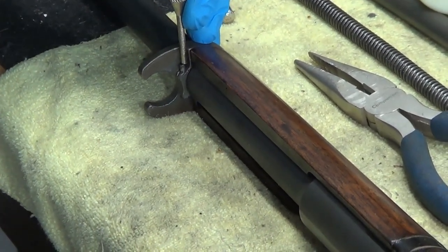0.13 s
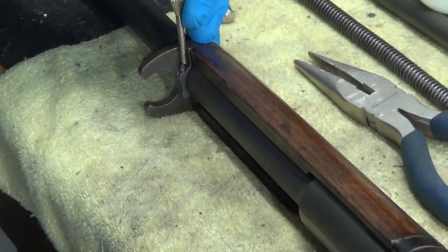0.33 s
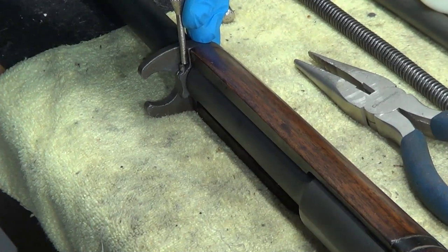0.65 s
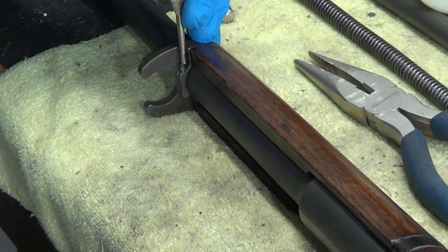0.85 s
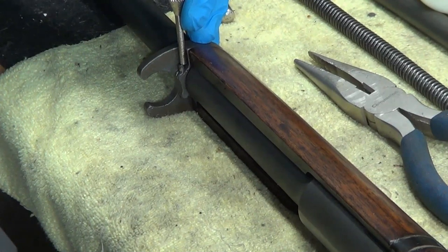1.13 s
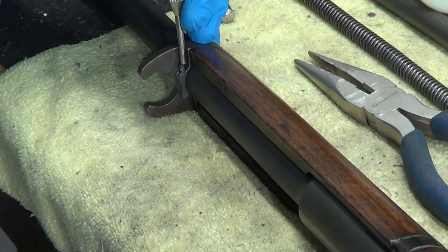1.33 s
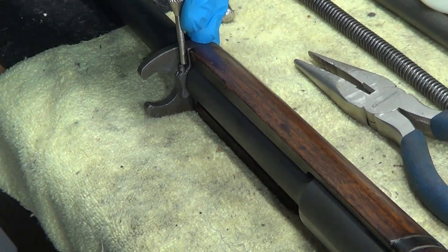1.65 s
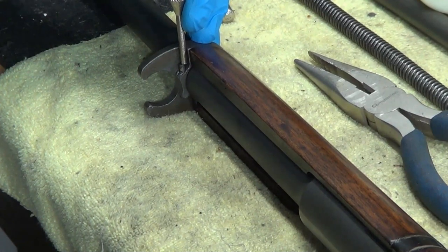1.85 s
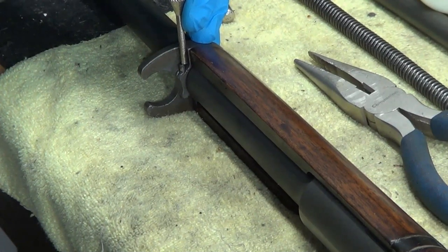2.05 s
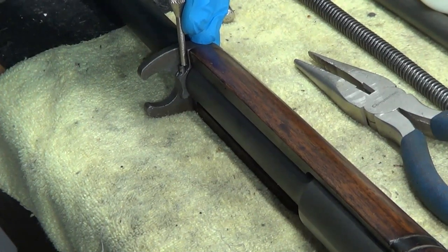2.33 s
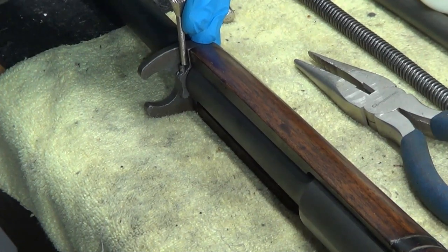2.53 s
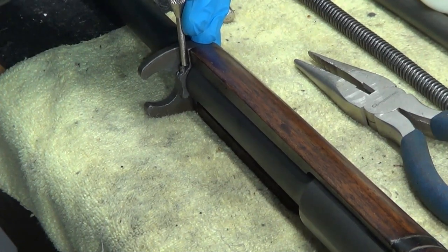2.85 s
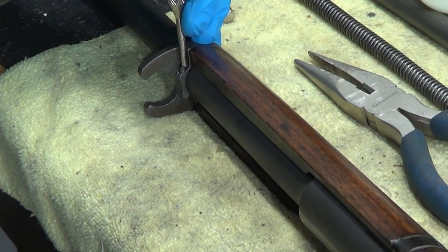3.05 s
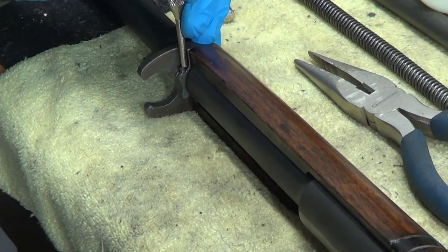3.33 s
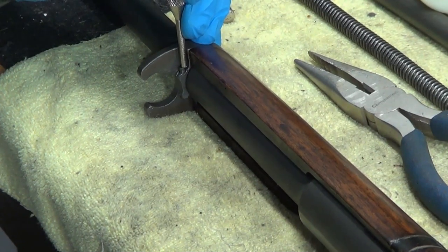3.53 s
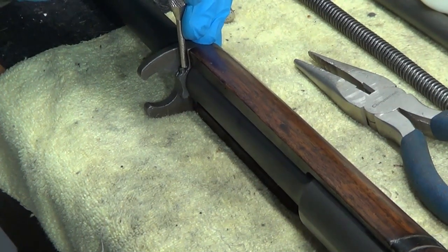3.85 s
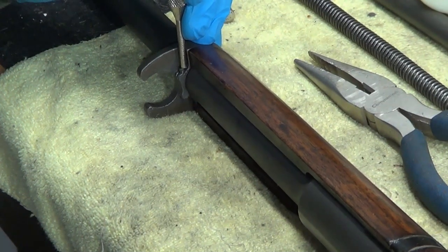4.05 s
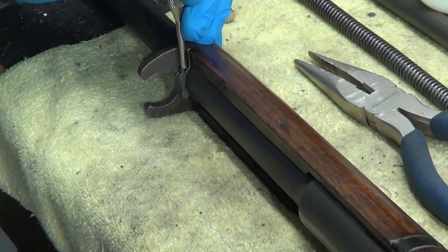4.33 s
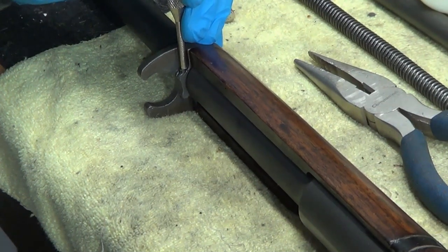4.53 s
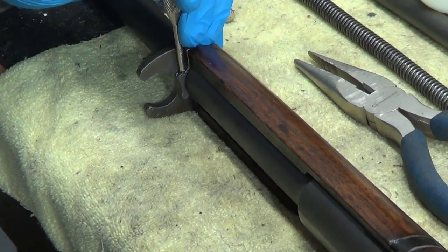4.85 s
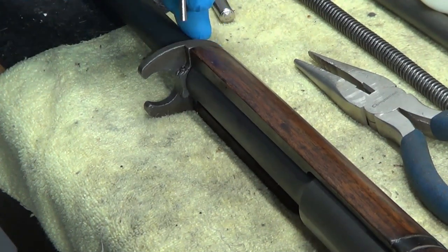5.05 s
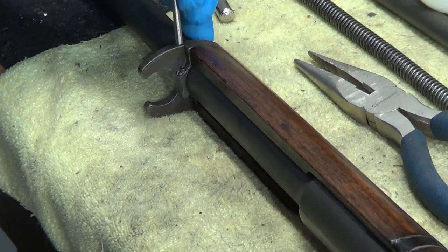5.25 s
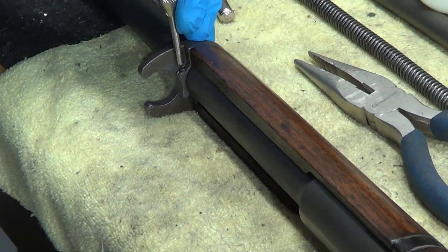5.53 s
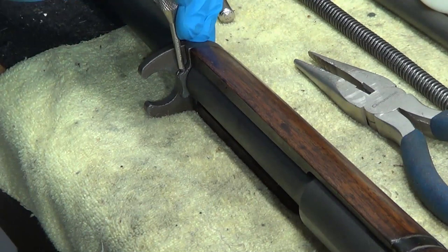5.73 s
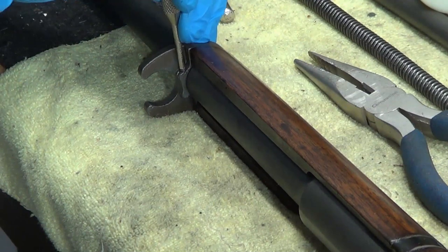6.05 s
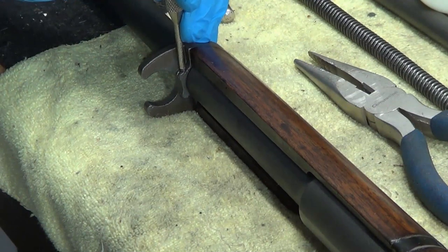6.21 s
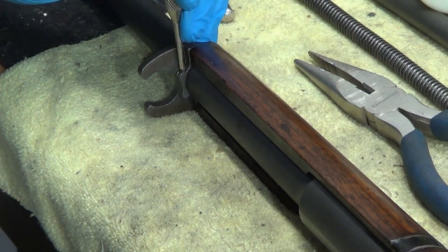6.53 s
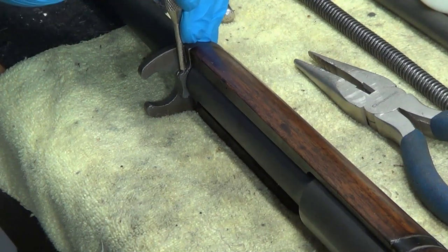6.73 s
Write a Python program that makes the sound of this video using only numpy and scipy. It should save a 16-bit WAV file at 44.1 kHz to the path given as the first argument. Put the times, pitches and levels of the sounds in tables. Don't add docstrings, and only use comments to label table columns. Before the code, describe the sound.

Close in a hard-walled room, a small hammer strikes a steel pin punch on a wood-and-steel piece. One tap and a knock, a lighter tap, then a steady run of about five clinks a second. The run stops, the punch is lifted and reset with tiny clicks and scrapes, and three last taps follow, over faint fan hum and a very high whine.

```python
import sys
import numpy as np
from scipy import signal
from scipy.fft import rfft, irfft
from scipy.io import wavfile

SR = 44100
rng = np.random.default_rng(int(sys.argv[2]) if len(sys.argv) > 2 else 0)


def persist_wave(psi):
    counts = np.round(np.clip(psi, -1, 1) * 32767).astype(np.int16)
    wavfile.write(sys.argv[1], SR, np.atleast_2d(counts).T)


def decibels_to_gain(level_db):
    exponent = np.asarray(level_db, float) / 20
    return 10 ** exponent


N = 303408
LEAD = SR // 4
LONG = N + LEAD

# start_s, strength_db, brightness_db, crack_db, squareness of the face (-0.61 to 1.9, higher is
BLOWS = [(-0.1304, -30, -4, -4, 0.5), (0.0722, -31.5, -4.5, 2.5, 0.51), (1.14, -38, 0.5, 7.5, -0.39),
         (1.732, -37.5, -2.6, 8, -0.47), (1.9584, -33.5, -3.5, 1, -0.41), (2.1688, -31, -5, 2, 0.47),
         (2.3741, -31, -5.4, 2, 0.76), (2.6069, -30, -4, 1.5, 0.33), (2.8176, -30, -5.5, 1.5, 0.26),
         (3.0153, -30.5, -2.7, 1, 0.45), (3.2074, -33.5, -2.5, 6, 0.93), (3.4209, -32, -6, 3, 0.88),
         (3.6375, -30.5, -5.5, -1.5, 0.28), (3.8413, -35, -3, 2.5, 0.77), (4.0593, -31, -2.5, 1, 0.28),
         (4.2656, -29, -4, -1.5, 0.3), (4.464, -30, -4, 0.5, 0.67), (4.6648, -30.5, -5.5, 0, 0.37),
         (4.8263, -27.5, -6, -1, 0.99), (6.4307, -40, 3, 6.5, -0.61), (6.6517, -28.5, -1.5, -3.5, 1.07),
         (6.878, -25, -15, -9.5, 1.9)]
START_S, STRENGTH_DB, BRIGHT_DB, CRACK_DB, SQUARENESS = np.array(BLOWS).T

# pitch_hz, level_db, sinking_db_per_s, squareness_db, reseated_db
WASH_TONE = [(750, -1.1, 0.04, 3.4, -0.5), (1220, 0, 0.57, 2.9, -12.5), (1520, 0.5, 0.46, 1.2, -0.5),
             (1980, 0, 0.97, 1.6, -5.7), (2570, 5, -0.8, 2.6, 2.6), (4300, 8.5, -1.29, 0.3, 0),
             (6330, -0.6, 0.21, -3, -0.7), (9050, 0.8, -0.82, 7, 1)]


def rms_one(x):
    return x / np.sqrt(np.mean(x ** 2) + 1e-20)


def at_hz(points, hz):
    points_hz, values = np.array(points)[:, :2].T
    return np.interp(np.log(hz), np.log(points_hz), values)


def clicks(seconds, sizes):
    out = np.full(LONG, 1e-18)
    places = (np.asarray(seconds) * SR).astype(int) + LEAD
    np.add.at(out, np.minimum(places, LONG - 1), sizes)
    return out


def ring(x, hz, t60):
    radius = decibels_to_gain(-60 / (t60 * SR))
    angle = 2 * np.pi * hz / SR
    return signal.lfilter([0, np.sin(angle)], [1, -2 * radius * np.cos(angle), radius * radius], x)


def band(x, low_hz, high_hz):
    sos = signal.butter(2, [low_hz, min(high_hz, .45 * SR)], "band", fs=SR, output="sos")
    return signal.sosfilt(sos, x)


def delayed(x, seconds):
    return np.pad(x, (round(seconds * SR), 0))[:LONG]


def toned(rows, hz):
    reseat_s = 5.5
    base_db, sink_db, square_db, reseat_db = (at_hz([(row[0], row[k]) for row in rows], hz) for k in (1, 2, 3, 4))
    shift_db = base_db + sink_db * START_S + square_db * SQUARENESS + reseat_db * (START_S > reseat_s)
    return shift_db * (hz > 600)


def struck(modes, level_db, tone, spread_db, swell_cycles=0):
    chance = rng.standard_normal((len(START_S), len(modes)))
    out = np.zeros(LONG)
    for k, (hz, db, t60) in enumerate(modes):
        blow_db = level_db + db + toned(tone, hz) + spread_db * chance[:, k]
        mode = ring(clicks(START_S, decibels_to_gain(blow_db)), hz, t60)
        if swell_cycles:
            mode = ring(mode, hz, swell_cycles / hz) * 2 * np.log(1000) * hz / (swell_cycles * SR)
        out += mode
    return out


def room_bands(build_s):
    # pitch_hz, level_db (per Hz)
    echo_colour = [(170, -3), (300, -4), (600, -11.5), (900, -10), (1350, -1.5), (2000, -6), (2700, -3.5),
                   (3800, -8), (5600, -10.5), (7700, -4), (9500, -9.5), (11500, -20), (15500, -28.5)]
    # pitch_hz, t60_s
    room_t60 = [(200, 0.26), (800, 0.39), (2200, 0.33), (6000, .32), (15000, 0.19)]
    t = np.arange(SR // 2) / SR
    edges_hz = 120 * 2 ** np.arange(0, 7.2, 1 / 6)
    white = rng.standard_normal((2, 4, len(t)))
    for k, (low_hz, high_hz) in enumerate(zip(edges_hz, edges_hz[1:])):
        hz = np.sqrt(low_hz * high_hz)
        swell = 1 - np.exp(-t / (build_s * max(1, 1500 / hz)))
        decay = decibels_to_gain(at_hz(echo_colour, hz) - 60 * t / at_hz(room_t60, hz))
        yield hz, band(white[k % 2], low_hz, high_hz) * swell * decay


def blows_in_room(bands, spread_db, slip_s):
    top_hz, top_db, top_octaves = 8060, 3.5, 0.087
    top_octaves_per_square, top_scatter_octaves = 0.088, .03
    sameness = 1.5
    count = len(START_S)
    chance = rng.standard_normal((count, len(bands), 2))
    moved_octaves = top_octaves_per_square * SQUARENESS + top_scatter_octaves * rng.standard_normal(count)
    peak_hz = top_hz * 2 ** moved_octaves
    blend = rng.standard_normal((count, 4)) + [sameness, 0, 0, 0]
    blend /= np.linalg.norm(blend, axis=1, keepdims=True)
    out = np.zeros(LONG + SR)
    for k, (hz, answers) in enumerate(bands):
        tilt_db = (BRIGHT_DB + 7.0) * np.clip(np.log2(hz / 3000), 0, 1) + toned(WASH_TONE, hz)
        peak_db = top_db * np.exp(-(np.log2(hz / peak_hz) / top_octaves) ** 2)
        gains = decibels_to_gain(STRENGTH_DB + tilt_db + peak_db + spread_db * chance[:, k, 1])
        starts = ((START_S + slip_s * np.abs(chance[:, k, 0])) * SR).astype(int) + LEAD
        for start, answer, gain in zip(starts, blend @ answers, gains):
            out[start:start + len(answer)] += gain * answer
    return out[:LONG]


def steel_crack():
    # pitch_hz, level_db, t60_s
    crack_modes = [(1500, -13, 0.037), (2100, -19, 0.0046), (3775, -10.5, 0.0092), (6300, -8.5, 0.0034),
                   (9050, -2.5, 0.0026), (14500, -16, 0.00081)]
    # pitch_hz, level_db, sinking_db_per_s, squareness_db, reseated_db
    crack_tone = [(1460, -8, -0.13, -8.5, .1), (2540, -23.5, 5.5, 5, 3), (3990, 6.5, -1.45, -0.3, .1),
                  (5900, 2, 0.33, -9, .1), (8800, -8.5, 0.91, 2.9, 0.094)]
    # delay_s, level_db
    walls = [
        (.0052, -5),
        (.0096, -4),
        (.0145, -8),
    ]
    crack = band(struck(crack_modes, STRENGTH_DB + CRACK_DB + 31, crack_tone, spread_db=1), 900, 12500)
    crack = decibels_to_gain(-11) * crack + delayed(crack, .00044)
    echoes = sum(decibels_to_gain(db) * delayed(crack, s) for s, db in walls)
    return crack + band(echoes, 900, 14400)


def followed_db(level_db, share):
    mean_blow_db = -30.5
    return level_db + share * (STRENGTH_DB - mean_blow_db)


def ringing_steel():
    # pitch_hz, level_db, t60_s
    steel_modes = [(430.3, -6.5, 0.57), (458, -14, 0.79), (742.5, -3, 0.49), (806, -6, 0.27),
                   (1083, -9.5, 0.43), (1171, 6.5, 0.16), (1354, -2, 0.46), (1653, -0.5, 0.23),
                   (1668, -2.5, 0.12), (1968, 0, 0.16), (2560, 2, 0.2), (1810, -17, 0.13),
                   (3776, -5.5, 0.19), (4430, -2, 0.14)]
    return struck(steel_modes, followed_db(-45, 0.34) + 15.0, WASH_TONE, spread_db=3, swell_cycles=44.0)


def bench_thud():
    # pitch_hz, level_db, t60_s
    bench_modes = [(156.6, -19, 0.54), (179.3, -5, 0.21), (204, -19.5, 0.15), (353, -7, 0.066)]
    soft = np.exp(-1 / (0.0021 * SR))
    push = struck(bench_modes, followed_db(-41, .55) + 29.0, WASH_TONE, spread_db=1.5)
    thud = signal.lfilter([1 - soft], [1, -soft], push)
    return band(band(thud, 140, 360), 140, 360)


def room_wash(bands):
    # pitch_hz, width_hz, level_db
    lumps = [(1350, 350, -8.5), (1925, 335, 1), (2640, 480, -4.5), (3790, 230, -4.5), (4580, 140, -13)]
    wash = blows_in_room(bands, spread_db=2, slip_s=.0002)
    for hz, width_hz, db in lumps:
        wash = wash + decibels_to_gain(db) * band(wash, hz - width_hz / 2, hz + width_hz / 2)
    return decibels_to_gain(21.0) * wash


def hammer(bands):
    return steel_crack() + ringing_steel() + bench_thud() + room_wash(bands)


def background():
    # pitch_hz, level_db (per Hz)
    air_colour = [(18, -61), (30, -7), (140, -4.5), (256, -8.5), (292, -1), (324, -11), (389, -1),
                  (455, -3.5), (673, -9.5), (787, -3), (852, -7.5), (8950, -24), (15500, -23.5)]
    # pitch_hz, width_hz, level_db
    fan_hums = [(660, 66, -59.5), (3530, 74, -63.5), (4140, 72, -71), (4740, 110, -68), (9960, 97, -72.5),
                (13200, 400, -69)]
    air_db, whine_db = -51 - 1.5, -59
    whine_hz, throb_hz, throb_null_s = 15741.5, 6.535, .447
    hz = np.maximum(np.fft.rfftfreq(LONG, 1 / SR), 10)
    air = rms_one(irfft(rfft(rng.standard_normal(LONG)) * decibels_to_gain(at_hz(air_colour, hz)), LONG))
    white = rng.standard_normal(LONG)
    fan = sum(decibels_to_gain(db) * rms_one(ring(white, centre_hz, 2.2 / width_hz)) for centre_hz, width_hz, db in fan_hums)
    t = (np.arange(LONG) - LEAD) / SR
    throb = np.sin(2 * np.pi * throb_hz * (t - throb_null_s))
    whine = 2 * np.sin(2 * np.pi * whine_hz * t) * throb
    return decibels_to_gain(air_db) * air + fan + decibels_to_gain(whine_db) * whine


def grit(length):
    t = np.arange(SR // 5) / SR
    uneven = rng.standard_normal(len(t)) * decibels_to_gain(3 * rng.standard_normal(len(t)))
    return uneven * (np.exp(-(t / length) ** 2) + 2 * np.exp(-t / .0008))


def add(out, s, sound, level_db, length):
    start = round(s * SR) + LEAD
    out[start:start + len(sound)] += decibels_to_gain(level_db) * rms_one(sound) * np.sqrt(5 * length)


def punch_knocks(out):
    # start_s, length_s, low_db, middle_db, top_db
    knocks = [
        (0.261, 0.013, -26.5, -20.5, -35.5),
        (1.398, 0.018, -35, -37.5, -40.5),
        (1.474, 0.023, -36.5, -39.5, -44),
        (4.9765, .003, -50, -33, -23),
        (4.986, 0.037, -49, -44, -36),
        (5.457, 0.014, -56, -52, -40.5),
        (5.7415, 0.011, -37, -40, -55),
    ]
    # pitch_hz, t60_s
    punch_groups = [
        [(1650, .016), (1950, .018), (2250, .014)],
        [(3500, .01), (3850, .016), (4100, .005)],
        [(5600, .004), (7000, .007)],
        [(8900, .012), (9500, .009), (10600, .004), (12000, .001)],
    ]
    upper_dip_db = -6.5
    hand_damping, dry_touch_db, touch_dull = 0.7, -1.5, .4
    for s, length, low_db, middle_db, top_db in knocks:
        upper_db = (middle_db + top_db) / 2 + upper_dip_db
        touch = band(grit(length), 1300, 15000)
        for group, level_db in zip(punch_groups, (low_db, middle_db, upper_db, top_db)):
            rings = 0
            for hz, t60 in group:
                held_s = hand_damping * t60
                resonance = rms_one(ring(ring(touch, hz, held_s), hz, held_s / 2))
                rings = rings + decibels_to_gain(2 * rng.standard_normal()) * resonance
            bare = rms_one(band(touch, .85 * group[0][0], 1.15 * group[-1][0]))
            knock = rms_one(rings) + decibels_to_gain(dry_touch_db) * bare
            add(out, s, signal.lfilter([1], [1, -touch_dull], knock), level_db, length)


def punch_rubs(out):
    # start_s, length_s, level_db, pitch_hz
    rubs = [(.263, .02, -45, 185), (1.4, .01, -40, 2900), (1.478, .014, -39, 2600), (4.985, .04, -37, 1700),
            (5.745, .008, -45, 3000), (5.462, .035, -53, 1430), (5.5, .005, -51, 1450),
            (5.511, .005, -43, 1500), (5.528, .013, -43, 1450), (5.545, .01, -52, 1550),
            (5.56, .007, -47, 1520), (5.59, .015, -56, 1500)]
    for s, length, level_db, hz in rubs:
        add(out, s, ring(ring(grit(length), hz, 28 / hz), hz, 14 / hz), level_db, length)


def shifts(bands):
    out = np.zeros(LONG)
    punch_knocks(out)
    punch_rubs(out)
    answer = signal.lfilter([1, -.6], [1], sum(answers[0] for hz, answers in bands))
    return out + decibels_to_gain(-10) * signal.oaconvolve(out, answer / np.linalg.norm(answer))[:LONG]


def scene():
    bands = list(room_bands(build_s=0.00067))
    return (hammer(bands) + background() + shifts(bands))[None, LEAD:]


def limiter(dry):
    limit_db, release_db_s, attack_s = -8.5, 235, 0.0047
    ahead = round(0.24 * attack_s * SR)
    over_db = np.maximum(20 * np.log10(np.abs(dry[0]) + 1e-9) - limit_db, 0)
    fall_db = release_db_s * np.arange(N) / SR
    held_db = np.maximum.accumulate(over_db + fall_db) - fall_db
    held_db = np.pad(held_db, (0, ahead), mode="edge")
    r = np.exp(-1 / (attack_s * SR))
    squeeze_db = signal.lfilter([1 - r], [1, -r], held_db)[ahead:]
    return dry * decibels_to_gain(-squeeze_db)


def top_cut(x):
    return signal.sosfilt(signal.butter(12, 16500, fs=SR, output="sos"), x)


def record(dry):
    bend = 0.12
    ceiling = .8
    rumble_db = -74
    x = signal.sosfilt(signal.butter(3, 120, "high", fs=SR, output="sos"), limiter(dry))
    x = ceiling * np.tanh((x + bend * x ** 2) / ceiling)
    x = x + decibels_to_gain(rumble_db) * rms_one(band(rng.standard_normal(N), 60, 130))
    mix = signal.sosfilt(signal.ellip(10, .5, 28, 15790, fs=SR, output="sos"), x)
    return top_cut(mix)


dry = scene()
out = record(dry)
persist_wave(out)
```